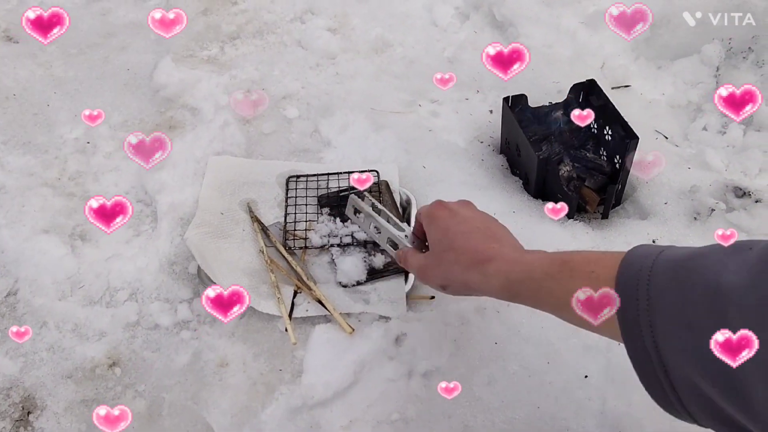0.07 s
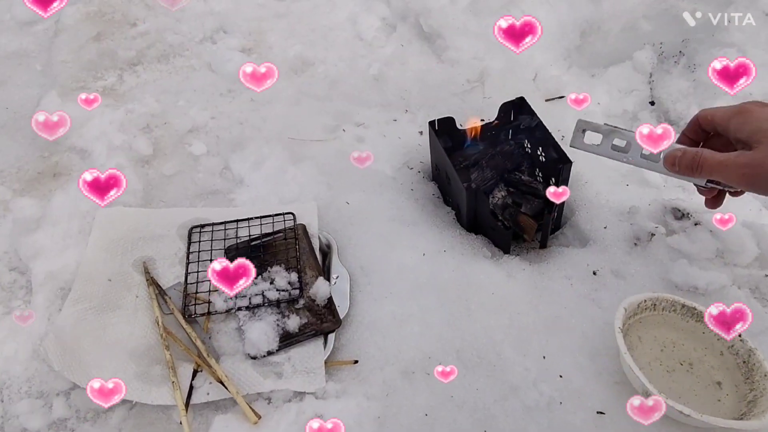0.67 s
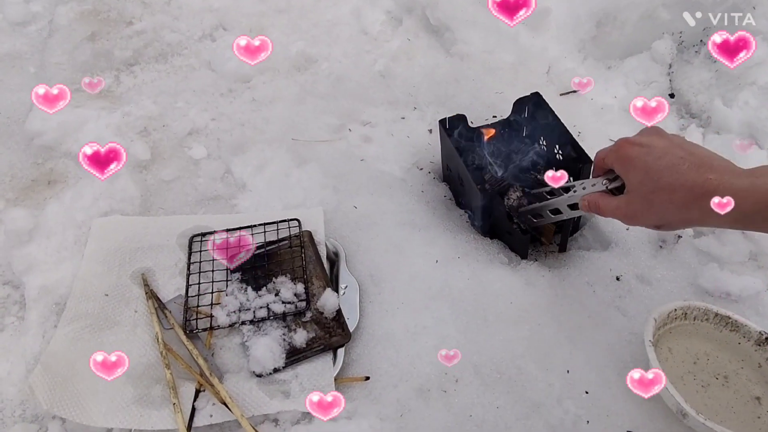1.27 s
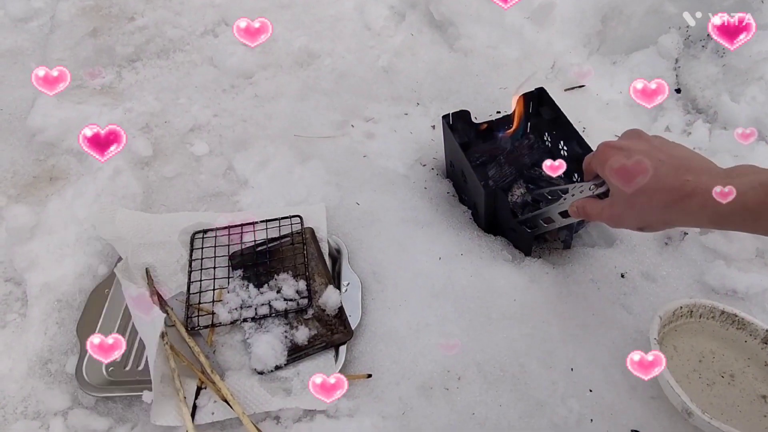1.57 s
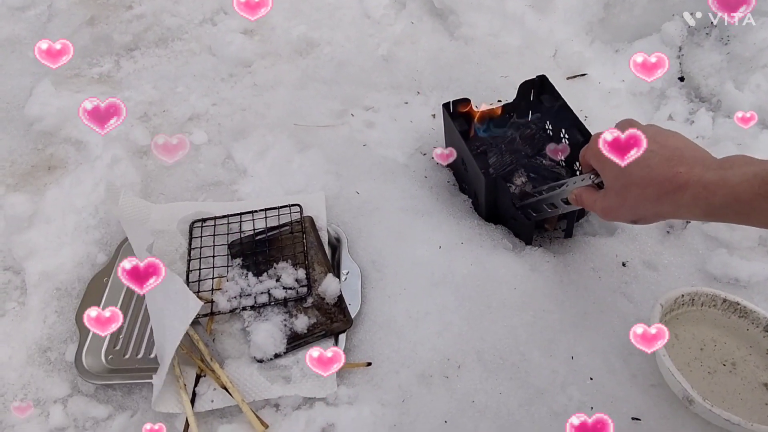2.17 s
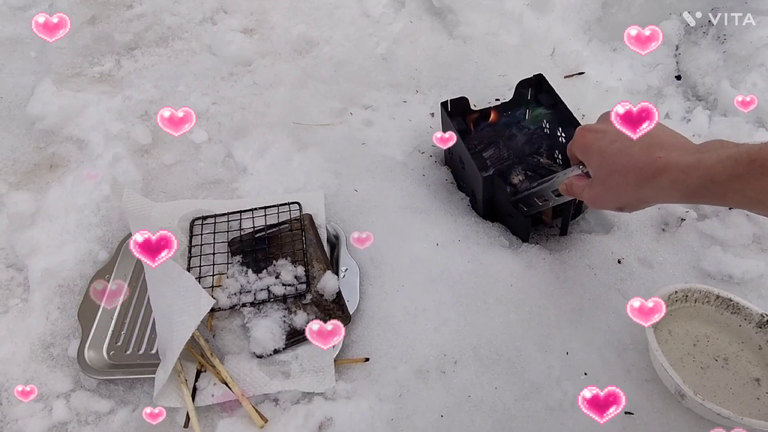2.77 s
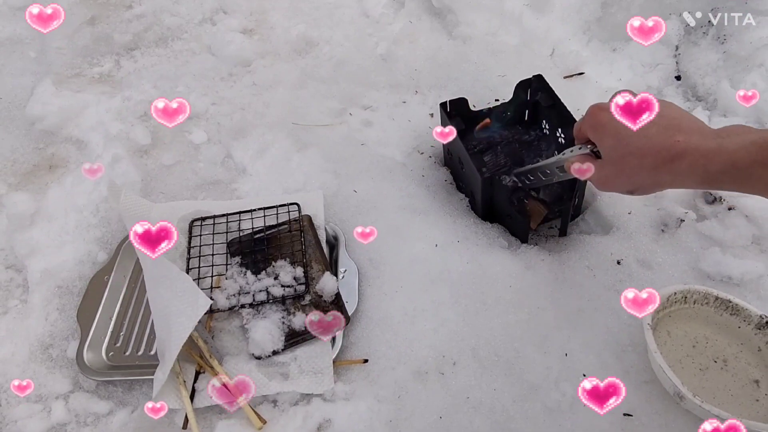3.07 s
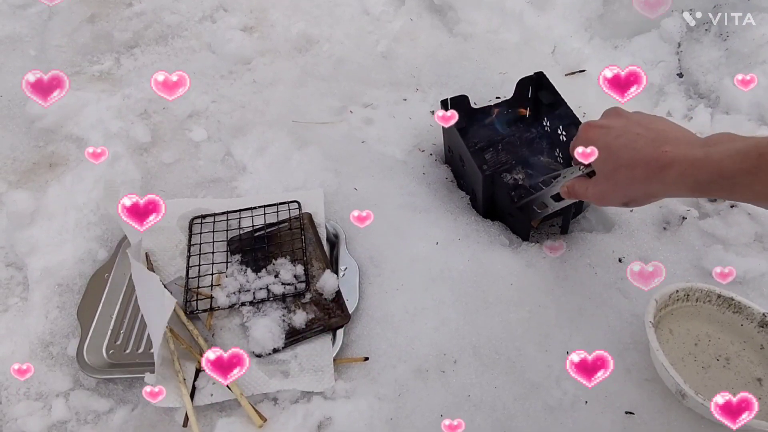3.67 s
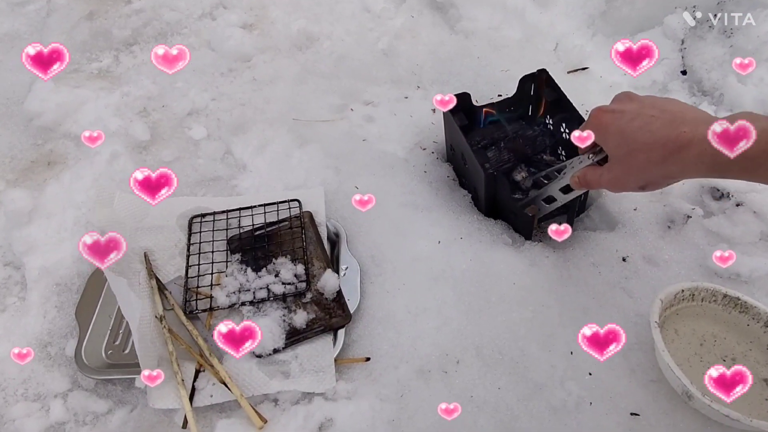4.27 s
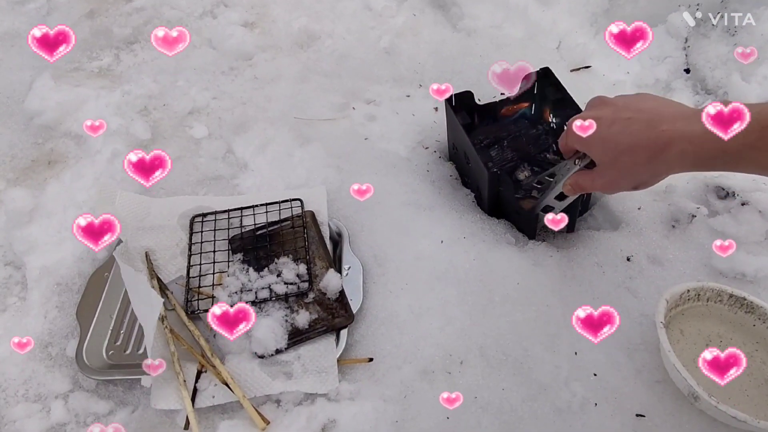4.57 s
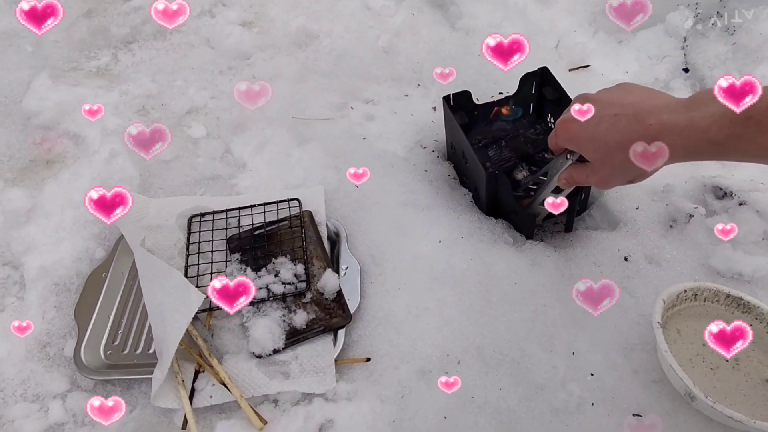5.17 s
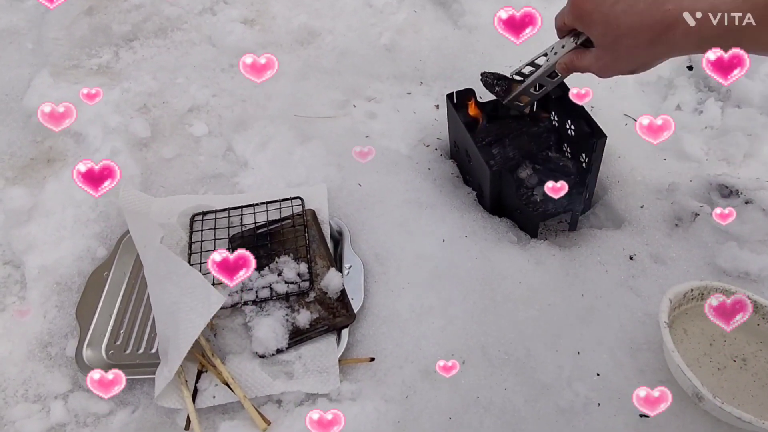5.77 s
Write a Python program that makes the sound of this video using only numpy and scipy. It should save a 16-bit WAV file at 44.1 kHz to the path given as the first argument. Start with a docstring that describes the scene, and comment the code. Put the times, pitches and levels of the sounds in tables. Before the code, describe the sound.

A small wood fire ticks faintly throughout, outdoors with no echo, over a distant hum and thin hiss. At the start, steel tongs clink and slide lightly on a wire grate. A soft tap follows, and a sleeve swishes around 0.6 seconds. From 1.4 seconds the tongs prod embers in a small sheet-metal stove, slightly to the right, making quiet, irregular dry crunches, scrapes and charcoal cracks. Wind buffets both sides of the microphone with low thumps from about 2.1 to 2.9 seconds, strongest near 2.5. The tongs snap shut with a sharp, bright click at 3.1 seconds and again, a little softer, at 4. Wood knocks the stove wall with a short ring at 4.3 and 5.5. Between 5.2 and 5.5 come three harder scrapes with brief high squeals, while lighter wind bumps continue until 5.7. A last small crunch comes at 6 seconds.

```python
"""Steel tongs poke charred wood in a small sheet-metal stove that stands in snow.
They clink off a wire grate, a sleeve swishes, then the tips crunch and scrape in the embers and
knock wood against the ringing stove wall. Twice they snap shut, steel on steel, with a sharp click.
Gas pockets in the burning wood tick faintly, a far hum hangs in the air, and a light wind buffets
the microphone's two openings (its left and right ports)."""
import sys
import numpy as np
from scipy import signal
from scipy.fft import rfft, irfft, next_fast_len
from scipy.io import wavfile
from scipy.ndimage import map_coordinates

SR = 44100
rng = np.random.default_rng(int(sys.argv[2]) if len(sys.argv) > 2 else 0)


def master_out(mix):
    """Clip the mix to full scale and print it as 16-bit PCM to the path in sys.argv[1]."""
    frames = np.transpose(np.atleast_2d(mix))
    ceiling = np.clip(frames, -1, 1)
    pcm = np.round(ceiling * 32767).astype(np.int16)
    wavfile.write(sys.argv[1], SR, pcm)


N = 266099
TIME = np.arange(N) / SR

# The tips prod the embers: start_s, level_db, dullness_db (extra low crunch), fade_s (to fall 60 dB)
PRODS = [(1.4667, -54.5, 7.5, 0.19), (1.5165, -57, -3, 0.023), (1.863, -49, -1.5, 0.071),
         (2.246, -58, -5, 0.06), (2.305, -45.5, 0, 0.02), (2.835, -49, -24, 0.1), (2.936, -48, 3, 0.07),
         (3.148, -50, -13, 0.076), (3.632, -50, -4.5, 0.11), (3.652, -63, 0, 0.24), (3.852, -57, 10, 0.05),
         (4.0014, -44, 1.5, 0.026), (4.031, -48, -18, 0.058), (4.312, -48, 5.5, 0.12),
         (4.425, -58.5, 5.5, 0.14), (4.501, -55, 2, 0.051), (4.734, -51.5, -15, 0.055),
         (5.138, -53.5, -1, 0.055), (5.46, -56.5, 13, 0.023), (5.997, -57.5, 3, 0.044)]
# How alike left and right are in scraping noise: pitch_hz, likeness (0 unrelated, 1 the same)
SCRAPE_LIKENESS = [(600, 0.91), (2000, 0.91), (5500, 0.086), (7000, 0.47), (12000, 0.87)]


def from_db(db):
    """Turn decibels into a gain."""
    return 10 ** (np.asarray(db) / 20)


def rms_one(x):
    """Scale a signal to an average power of 1."""
    return x / np.sqrt(np.mean(x ** 2) + 1e-20)


def at_bins(points):
    """Read a table of (pitch_hz, value) at every frequency of the spectrum."""
    hz, value = np.transpose(points)
    bin_hz = np.fft.rfftfreq(next_fast_len(N), 1 / SR)
    return np.interp(np.log(bin_hz + 1), np.log(hz), value)


def noise(colour, likeness=None):
    """Stereo noise of power 1, with a given tone colour and left-right likeness."""
    size = next_fast_len(N)
    mid, side = rfft(rng.standard_normal((2, size))) * from_db(at_bins(colour))
    alike = 0 if likeness is None else np.clip(at_bins(likeness), -1, 1)
    spectrum = np.sqrt(1 + alike) * mid + np.sqrt(1 - alike) * side * [[1], [-1]]
    return rms_one(irfft(spectrum, size)[:, :N])


def drift(rate):
    """A random wander of power 1 that heads for a new value `rate` times a second."""
    return rms_one(np.interp(TIME * rate, np.arange(N), rng.standard_normal(N)))


def cut(x, hz, kind, order=2):
    """Keep the "low" or the "high" side of a frequency."""
    return signal.sosfilt(signal.butter(order, hz, kind, fs=SR, output="sos"), x + 1e-18)


def resonate(x, hz, width_hz):
    """One resonance: keep a band around hz, with gain 1 at its peak."""
    r = np.exp(-np.pi * width_hz / SR)
    feedback = [1, -2 * r * np.cos(2 * np.pi * hz / SR), r * r]
    return signal.lfilter(np.array([1, 0, -1]) * (1 - r * r) / 2, feedback, x + 1e-18)


def pitched_noise(hz, width_hz):
    """Noise sent twice through a resonance becomes a rough tone."""
    return resonate(resonate(rng.standard_normal(N), hz, width_hz), hz, width_hz)


def clicks(rows):
    """A one-sample click for each (start_s, level_db)."""
    out = np.zeros(N)
    for start_s, db in rows:
        out[round(start_s * SR)] += from_db(db)
    return out


def decay(start_s, fade_s):
    """A level that jumps to 1, then falls 60 dB in fade_s."""
    out, start = np.zeros(N), round(start_s * SR)
    age = TIME[:min(N - start, int(2 * fade_s * SR))]
    out[start:start + len(age)] = from_db(-60 * age / fade_s)
    return out


def stroke(start_s, length_s, swell_db=0, attack_s=0.037, release_s=0.014):
    """Sliding pressure: it rises 20 dB per attack_s, swells or eases, then falls 20 dB per release_s."""
    early = np.maximum(start_s - TIME, 0)
    late = np.maximum(TIME - start_s - length_s, 0)
    along = np.clip((TIME - start_s) / length_s, 0, 1) - .5
    db = swell_db * along - 20 * (early / attack_s + late / release_s)
    return from_db(np.maximum(db, -200))


def slipping(fine_db, coarse_db):
    """Friction catches and lets go unevenly, so the level flutters."""
    return rms_one(from_db(fine_db * drift(rate=1500) + coarse_db * drift(rate=230)))


def struck(blows, modes, spread_db):
    """Each blow rings every mode (a natural tone of the object) with a partly random strength."""
    out, luck = 0, rng.standard_normal((len(blows), len(modes)))
    for k, (hz, mode_db, fade_s) in enumerate(modes):
        r, angle = from_db(-60 / (fade_s * SR)), 2 * np.pi * hz / SR
        force = clicks([(s, db + mode_db + spread_db * own[k]) for (s, db), own in zip(blows, luck)])
        ring = signal.lfilter([0, np.sin(angle)], [1, -2 * r * np.cos(angle), r * r], force + 1e-18)
        out = out + (-1) ** k * ring
    return out


def rubbing(force, modes, wander_db, pitch_stray=.012):
    """Friction feeds resonances that swell, fade and slide in pitch as the point of contact moves."""
    out = 0
    for hz, width_hz, db in modes:
        gain = from_db(db + wander_db * (np.clip(drift(rate=32), -1.7, 1.7) - 0.98))
        tone = pitched_noise(hz, width_hz)
        position = np.cumsum(1 + pitch_stray * drift(rate=18))  # uneven speed bends the pitch
        out = out + gain * map_coordinates(tone, [position], order=3, mode="mirror")
    return force * out


def splinters(rows, fade_s, ring_db=-6.5):
    """Wood splits: a short burst around a pitch, and three chips ringing near it."""
    out, age = np.zeros(N), TIME[:SR // 20]
    for start_s, db, hz in rows:
        burst = rms_one(resonate(rng.standard_normal(len(age)), hz, width_hz=0.63 * hz))
        ring = np.sin(2 * np.pi * hz * rng.uniform(.6, 1.1, (3, 1)) * age).sum(axis=0)
        split = from_db(db - 60 * age / fade_s) * (burst + from_db(ring_db) * ring)
        start = round(start_s * SR)
        out[start:start + len(age)] += split[:N - start]
    return out


def from_right(x, lag_s, pan_db):
    """Sound from the right reaches the left port later and weaker."""
    left, right = np.broadcast_to(x, (2, N))
    late_left = np.roll(left, round(lag_s * SR))
    return np.array([late_left * from_db(pan_db / 2), right * from_db(-pan_db / 2)])


def at_ports(x, lag, balance):
    """Share a sound between the ports, with a lag and a balance that depend on frequency."""
    size = next_fast_len(N)
    gains = from_db(at_bins(balance) * np.array([[1], [-1]]) / 2)
    left, right = rfft(np.broadcast_to(x, (2, N)), size) * gains
    return irfft([left * np.exp(-1j * at_bins(lag)), right], size)[:, :N]


def outdoors():
    """A far hum and a thin, even hiss."""
    # Tone colours of the hum and the hiss: pitch_hz, relative_db
    hum_colour = [(30, 7), (120, -3), (250, -2.5), (390, 1), (520, -4), (700, -11), (1000, -23),
                  (2000, -32)]
    hiss_colour = [(300, 0.5), (1000, 4.5), (2000, 1.5), (4000, -5.5), (7000, -8), (10000, -8.5),
                   (14000, -8.5)]
    # How alike left and right are: pitch_hz, likeness
    likeness = [(60, 0.9), (130, 0.94), (290, 1), (630, 0.49), (1400, 0), (3000, 0), (6500, 0.62),
                (14000, 0.98)]
    hum = from_db(-56.5 + 2.19 * drift(rate=21)) * noise(hum_colour, likeness)
    hiss = from_db(-64.5 + .5 * drift(rate=22)) * noise(hiss_colour, likeness)
    return hum + hiss


def wind():
    """Air churns at each port; a passing eddy (a swirl) is a pressure peak between two troughs."""
    # Wind strength at the ports: time_s, left_db, right_db
    breeze = [(0, -56, -49), (0.33, -50.5, -67), (0.74, -53, -72), (1.35, -54, -68), (1.66, -81, -63),
              (1.93, -54, -44), (2.25, -51, -45.5), (2.33, -30.5, -37.5), (2.56, -39, -39),
              (2.77, -47, -38), (2.9, -36, -48), (3.38, -65, -57.5), (3.5, -46.5, -63.5), (4.2, -52, -69),
              (4.44, -44.5, -62), (5.0, -63, -56), (5.09, -37, -71), (5.72, -44.5, -68), (5.9, -61.5, -64)]
    # The strongest eddies: time_s, peak_db, port (0 left, 1 right)
    eddies = [(0.08, -36, 1), (1.76, -34, 1), (2.109, -27.5, 1), (2.332, -19.5, 0), (2.375, -29, 0),
              (2.402, -17.5, 0), (2.422, -17, 1), (2.497, -16.5, 1), (2.555, -8, 1), (2.558, -15, 0),
              (2.568, -9.5, 1), (2.665, -23.5, 1), (2.694, -24.5, 0), (2.822, -20.5, 1), (2.929, -29.5, 0),
              (5.228, -30, 0), (5.299, -23.5, 0), (5.316, -25, 0), (5.523, -27.5, 0), (5.575, -25.5, 0),
              (5.705, -26, 0)]
    # Tone colour of churning air: pitch_hz, relative_db
    churn_colour = [(20, 3), (45, 4.5), (110, -2), (200, -6.5), (300, -15.5), (450, -28), (900, -68)]
    peak_width_cycles, wake_db, wake_s = 0.26, -20, 0.062  # the wake is the rough air around an eddy
    times, *port_levels = np.transpose(breeze)
    strength = from_db([np.interp(TIME, times, db) for db in port_levels])
    peaks = np.zeros((2, N))
    for time_s, peak_db, port in eddies:
        near = np.abs(TIME - time_s) < .1
        age, side = TIME[near] - time_s, round(port)
        cycles = age * 200.7 * 2 ** ((peak_db + 18.5) / 30.5)  # 200.7 Hz at -18.5 dB, higher if stronger
        pulse = np.cos(2 * np.pi * cycles) / np.cosh(cycles / peak_width_cycles)
        peaks[side, near] += from_db(peak_db) * pulse
        wake = from_db(peak_db + wake_db) * np.exp(-(age / wake_s) ** 2)
        strength[side, near] = np.hypot(strength[side, near], wake)
    lumps = np.array([rms_one(from_db(4.6 * drift(rate=55))) for _ in range(2)])
    churn = lumps * noise(churn_colour)
    # Faster air sheds smaller eddies, so a gust sounds higher.
    gust = rms_one(cut(churn, hz=165, kind="high", order=1))
    gust_share = strength ** 2 / (strength ** 2 + from_db(-35) ** 2)
    return peaks + strength * ((1 - gust_share) * churn + gust_share * gust)


def fire():
    """Gas pockets burst in the wood: a few clear pops, and many faint ones scattered by the walls."""
    # The clear pops: start_s, relative_db, pitch_hz
    pops = [(0.2818, -46, 13000), (0.7485, -39, 11000), (1.028, -43, 6000), (1.135, -40.5, 6870),
            (1.677, -44, 9000), (1.8035, -41, 8840), (2.0645, -38, 11570), (2.503, -48.5, 10000),
            (3.244, -46, 4000), (3.417, -43, 11600), (4.129, -42, 11100), (4.177, -48, 11000),
            (4.921, -47, 12000), (5.076, -41, 10000), (5.525, -36.5, 12300), (5.794, -46.5, 10100),
            (5.98, -44, 11100)]
    ticks_per_s, scatter_fade_s = 8, .012
    bursts = rng.random(N) < ticks_per_s / SR
    sizes = from_db(-59 + 3.9 * np.minimum(rng.exponential(1, N), 2.5))
    age = TIME[:SR // 50]
    scatter = rng.standard_normal(len(age)) * from_db(-60 * age / scatter_fade_s)
    ticks = cut(signal.fftconvolve(bursts * sizes, scatter)[:N], hz=4000, kind="high")
    return from_db(-3) * ticks + from_db(-14) * splinters(pops, fade_s=0.015)


def sleeve():
    """Cloth slides on cloth, swelling and fading as the arm swings over to the stove."""
    # Tone colour of the cloth: pitch_hz, relative_db
    cloth_colour = [(400, -1.5), (1100, 0), (1900, 3), (3200, -4.5), (4500, -2), (7000, -6), (10000, -6),
                    (14000, -13)]
    peak_s, peak_db, rounding_s = .62, -51, 0.03
    db_per_s = np.where(TIME < peak_s, 89.5, 122)  # it fades faster than it swells
    swing_db = peak_db - db_per_s * (np.hypot(TIME - peak_s, rounding_s) - rounding_s)
    level = from_db(swing_db + 2.1 * drift(rate=40.3))
    return level * noise(cloth_colour, likeness=[(500, 0.67), (14000, 0.15)])


def grate():
    """The tongs clink on the wire grate and slide off it as they are picked up."""
    # Knocks on the wires: start_s, level_db
    clinks = [(0.0377, -45.5), (0.0403, -61), (0.056, -64), (0.09, -64), (0.12, -62)]
    # Slides over them: start_s, length_s, level_db
    slides = [(0.049, 0.017, -49), (0.084, 0.015, -55), (0.121, 0.011, -52), (0.141, 0.031, -56)]
    # Natural tones of the grate: pitch_hz, relative_db, fade_s
    modes = [(928, -5, 0.053), (1900, -4, .025), (2260, -4, .028), (3270, -8, .028), (3700, -19, 0.028),
             (4930, -7, .028), (5650, 1, .03), (7200, -5, 0.019), (7970, -4.5, .03), (9700, -10, 0.015)]
    # Tone colour of the contact hiss: pitch_hz, relative_db
    hiss_colour = [(500, -2.5), (2200, 4), (4000, -5.5), (8000, -2.5), (11000, -9), (14000, -1.5)]
    wire_width_hz = 230
    wires = [(hz, wire_width_hz, db) for hz, db, _ in modes]
    force = sum(from_db(db) * stroke(s, length_s, attack_s=0.014) for s, length_s, db in slides)
    force *= from_db(2.7 * drift(rate=1200))
    contact = force + sum(from_db(db + 10) * decay(s, fade_s=0.021) for s, db in clinks)
    hiss = from_db(-3.5) * contact * noise(hiss_colour, SCRAPE_LIKENESS)
    return struck(clinks, modes, spread_db=2) + from_db(7) * rubbing(force, wires, wander_db=3.5) + hiss


def stove_wall():
    """Sheet metal rings when knocked, brighter if the contact is hard, and sings when dragged on."""
    # Natural tones of the stove: pitch_hz, relative_db, fade_s
    modes = [(624, -14.5, 0.15), (1086, -2, 0.074), (1211, -8, 0.11), (1320, -13, .06),
             (1560, -10.5, 0.073), (1750, -17, 0.13), (1970, -23, 0.053), (2360, -18, 0.1),
             (3320, -31, .07), (5650, -22, .05)]
    # Wood knocks on the wall: start_s, level_db, hardness_db_per_octave
    knocks = [(1.471, -52, 5), (1.613, -53.5, -2), (1.863, -53, 7), (3.634, -51, -7), (3.853, -49.5, 6.5),
              (4.315, -33.5, -0.5), (4.322, -50, 13), (4.428, -58, 1), (5.4622, -40, 2)]
    # The tips drag along it: start_s, length_s, level_db
    drags = [(1.524, 1, -78), (2.52, 0.14, -67.5), (3.63, 0.257, -71)]
    main_hz = modes[1][0]
    force = sum(from_db(db) * stroke(s, length_s) for s, length_s, db in drags)
    force *= from_db(3.7 * drift(rate=62))
    out = force * rms_one(pitched_noise(main_hz, width_hz=250))
    for start_s, db, hardness in knocks:
        tilted = [(hz, level + hardness * np.log2(hz / main_hz), fade_s) for hz, level, fade_s in modes]
        out += struck([(start_s, db)], tilted, spread_db=2)
    return out


def taps():
    """A soft contact makes a rounded pulse, heard as a dull tap."""
    # Soft contacts: start_s, level_db, upper_edge_hz
    contacts = [(0.378, -32.5, 630), (3.1084, -25, 1980), (3.438, -51, 1490), (5.086, -34, 1550),
                (5.094, -31.5, 1500), (5.099, -32.5, 1300)]
    out = np.zeros(N)
    for start_s, db, edge_hz in contacts:
        pulse = cut(clicks([(start_s, 0)]), edge_hz, "low", order=4)
        out += from_db(db) * pulse / pulse.max()
    return cut(out, hz=174, kind="high")


def sharp_cracks():
    """Short sharp cracks: single bits of charcoal break under the tips, and some knocks start with a crisp
    crack."""
    # The cracks: start_s, relative_db, pitch_hz
    cracks = [(1.4708, -33.5, 2520), (1.4708, -42, 9700), (1.517, -37.5, 3750), (1.5275, -43, 7800),
              (1.863, -42, 4900), (2.306, -38, 7040), (2.791, -35, 9900), (2.835, -39, 10600),
              (2.852, -39, 9900), (2.931, -44, 10100), (2.9875, -44, 9400), (3.005, -37, 8100),
              (3.018, -34, 8900), (3.0365, -37, 6840), (3.632, -41, 9800), (3.652, -45, 10000),
              (3.852, -40, 9700), (3.853, -40, 2060), (3.9265, -45, 4020), (3.9605, -43, 10000),
              (3.992, -33, 9000), (3.9975, -34, 2400), (4.0025, -30, 8850), (4.3135, -37.5, 6540),
              (4.3215, -35, 6000), (4.488, -41.5, 7850), (4.4995, -37.5, 3700), (5.182, -37.5, 9000),
              (5.263, -41, 10400), (5.349, -41, 11000), (5.4625, -35, 2500), (5.998, -38, 3970)]
    return from_db(-12) * splinters(cracks, fade_s=0.014)


def chips(fade_s=0.0072):
    """Each prod sets six bits of charcoal ringing at random pitches."""
    out, age = np.zeros(N), TIME[:SR // 12]
    pitches = np.exp(rng.uniform(np.log(1500), np.log(12000), (len(PRODS), 6, 1)))
    for (start_s, db, dullness_db, _), hz in zip(PRODS, pitches):
        sizes = from_db(dullness_db * (hz < 5000))
        tones = (sizes * np.sin(2 * np.pi * hz * age)).sum(axis=0)
        ring = from_db(db - 16 - 60 * age / fade_s) * tones
        start = round(start_s * SR)
        out[start:start + len(age)] += ring[:N - start]
    return out


def embers():
    """The tips crush and scrape charcoal: a dry rustle over a dull crunch, metallic under pressure."""
    # Scrapes through the embers: start_s, length_s, level_db, dullness_db, swell_db (start to end)
    scrapes = [(1.443, 0.021, -59, -28, 1), (1.614, 0.026, -62, -1.5, -6), (1.926, 0.032, -64, 6.5, 3),
               (2.335, 0.31, -65, -1.5, -14), (2.781, 0.067, -57.5, -15, -12.5), (2.955, 0.1, -55, -3, -4),
               (3.885, 0.12, -58.5, -2.5, 21), (5.114, 0.13, -65, 8, 0), (5.248, 0.041, -46.5, -6.5, -2.5),
               (5.319, 0.04, -45, -4.5, -5.5), (5.42, 0.039, -44, -2, 1), (5.91, 0.078, -70.5, 6, -2)]
    # Resonances of rubbed steel and of hollows between the sticks: pitch_hz, width_hz, relative_db
    steel_modes = [(2420, 300, -7.5), (4000, 480, -7), (5000, 580, -8), (6470, 250, -2), (6780, 280, -2),
                   (7250, 430, -6.5), (8000, 450, -4), (8900, 450, -18), (9750, 560, -3.5),
                   (10660, 470, -10.5), (11570, 540, -8.5), (13400, 550, -3.5)]
    hollows = [(910, 380, -7), (1120, 550, -2.5), (1704, 200, -1.5), (1918, 55, -0.5), (2333, 83, -4.5),
               (2720, 250, -4), (3170, 1000, -4), (3880, 160, -4.5), (5350, 1700, -9.5)]
    # Tone colours of the rustle and the crunch: pitch_hz, relative_db
    rustle_colour = [(3500, -13), (4900, -5), (6500, -6), (9700, 2.5), (14000, -4.5)]
    crunch_colour = [(350, 0), (700, 4.5), (1900, 5.5), (4000, -11.5), (5300, 0.5), (6500, -6),
                     (12000, -16)]
    crumble_db, crumble_fade_s = -19.5, 0.28  # charcoal goes on crumbling after each prod
    steel_sings_db = -52  # above this contact strength the steel takes over from the rustle
    crush, slide = slipping(fine_db=3, coarse_db=2), slipping(fine_db=2.8, coarse_db=1.5)
    contacts = []
    for start_s, db, dullness_db, fade_s in PRODS:
        crumble = from_db(crumble_db) * decay(start_s, crumble_fade_s)
        contacts.append((from_db(db) * crush * (decay(start_s, fade_s) + crumble), dullness_db))
    for start_s, length_s, db, dullness_db, swell_db in scrapes:
        contacts.append((from_db(db) * slide * stroke(start_s, length_s, swell_db), dullness_db))
    bright = sum(force for force, _ in contacts)
    dull = sum(force * from_db(dullness_db) for force, dullness_db in contacts)
    steel_share = bright ** 2 / (bright ** 2 + from_db(steel_sings_db) ** 2)
    steel = from_db(12.5) * np.sqrt(steel_share) * rubbing(bright, steel_modes, wander_db=5)
    rustle = from_db(-3) * np.sqrt(1 - steel_share) * bright * noise(rustle_colour, SCRAPE_LIKENESS)
    hollow_ring = from_db(10.5) * rubbing(dull, hollows, wander_db=6)
    crunch = from_db(-3.5) * dull * noise(crunch_colour, SCRAPE_LIKENESS)
    return steel + rustle + hollow_ring + crunch


def squeal(jitter_hz=150):
    """Pressed hard, the steel squeals on one shaky tone and, more faintly, the octave above."""
    # The hardest scrapes: start_s, length_s, level_db, pitch_hz
    squeals = [(5.238, .045, -51.5, 6760), (5.317, 0.034, -46, 6650), (5.423, 0.02, -47, 6580)]
    out = 0
    for start_s, length_s, db, hz in squeals:
        cycles = np.cumsum(hz + jitter_hz * drift(rate=500)) / SR
        tone = np.sin(2 * np.pi * cycles) + from_db(-19) * np.sin(4 * np.pi * cycles)
        out = out + from_db(db) * stroke(start_s, length_s) * tone
    return out * rms_one(from_db(3.9 * drift(rate=400)))


def snaps():
    """Steel hits steel: a bright crack, then ringing arms that a tight grip cuts short and muffles."""
    # The tips meet and rebound: start_s, level_db, middle_db (0 = unmuffled), ring_share (of fade_s)
    hits = [(3.1082, -4, 0, 1), (3.1153, -17, 0, 1), (3.1199, -31, 0, .7), (4.0215, -9.5, -18, .7)]
    # Natural tones of the tongs: pitch_hz, relative_db, fade_s
    modes = [(890, -30, 0.011), (2500, -23.5, 0.014), (3250, -28, 0.019), (4050, -20, 0.012),
             (4530, -15, .018), (4810, -14, 0.027), (5080, -16.5, .016), (5650, -25.5, .014),
             (6700, -24.5, 0.028), (7120, -28, .02), (8600, -16, 0.0092), (8920, -10.5, 0.0077),
             (9430, -7.5, 0.0097), (9970, -11, 0.0094), (10500, -14, .008), (11330, -11, 0.012),
             (12200, -14, .007), (13200, -12, 0.0083), (14000, -19, .012)]
    out = np.zeros(N)
    for start_s, db, middle_db, ring_share in hits:
        blow = [(start_s, db)]
        sharp_click = cut(clicks(blow), hz=8200, kind="high", order=3)
        crack = from_db(5) * cut(sharp_click, hz=12500, kind="low")
        hiss = cut(rng.standard_normal(N), hz=5040, kind="high", order=1)
        grit = from_db(db - 14) * decay(start_s, fade_s=0.015 * ring_share) * hiss
        gripped = [(hz, mode_db, fade_s * ring_share) for hz, mode_db, fade_s in modes]
        snap = from_db(-2.5) * struck(blow, gripped, spread_db=-1) + crack + grit
        middle_tones = resonate(snap, hz=7100, width_hz=2600)
        out += snap - (1 - from_db(middle_db)) * middle_tones
    return out


def scene():
    """The stove and the arm lie to the right; the snow gives no echo."""
    # How far the left port lags, for stove sounds and for snaps: pitch_hz, lag_radians
    stove_lag = [(100, 0), (700, .4), (1600, 1.1), (3300, .7), (4800, 1.4), (5800, 2.6), (6500, 0)]
    snap_lag = [(100, 0), (1000, .6), (2500, 1.6), (4800, 2.7), (6500, 4.5), (8500, 5), (9600, 6),
                (11500, 6.3), (12800, 6.2), (13400, 4.8)]
    # How unevenly they reach the ports: pitch_hz, left_minus_right_db
    stove_balance = [(500, -1), (3000, -4), (5000, 0.5), (8000, -5), (11000, 1.5)]
    snap_balance = [(2500, -1.5), (5000, 2), (9000, -7), (11000, -1), (12200, 3), (13200, 9)]
    handling = embers() + chips() + taps() + stove_wall() + squeal() + grate()
    soft = at_ports(handling, stove_lag, stove_balance)
    soft += from_right(sleeve(), lag_s=0.00043, pan_db=-6.5) + wind() + outdoors()
    crackle = at_ports(fire() + sharp_cracks(), stove_lag, stove_balance)
    snapping = at_ports(snaps(), snap_lag, snap_balance)
    return cut(soft, hz=14200, kind="low", order=24) + crackle + snapping


def record(dry):
    """Cut away the deepest rumble and the highest treble."""
    top_hz = 14550
    treble_cut = signal.ellip(8, .3, 70, top_hz, fs=SR, output="sos")
    return signal.sosfilt(treble_cut, cut(dry, hz=14.7, kind="high"))


dry = scene()
out = record(dry)
master_out(out)
```